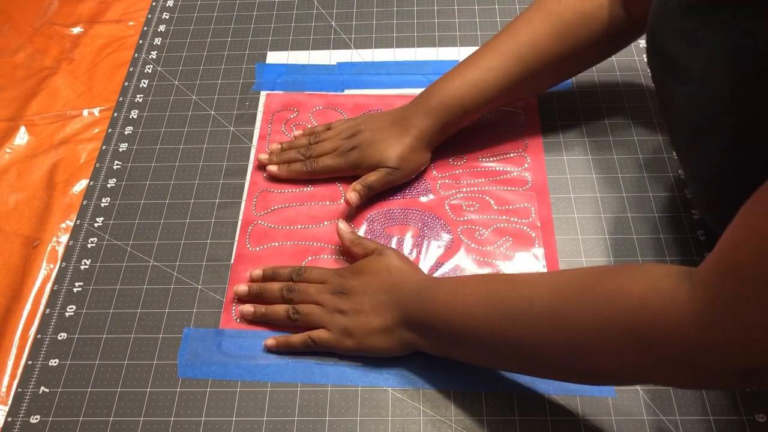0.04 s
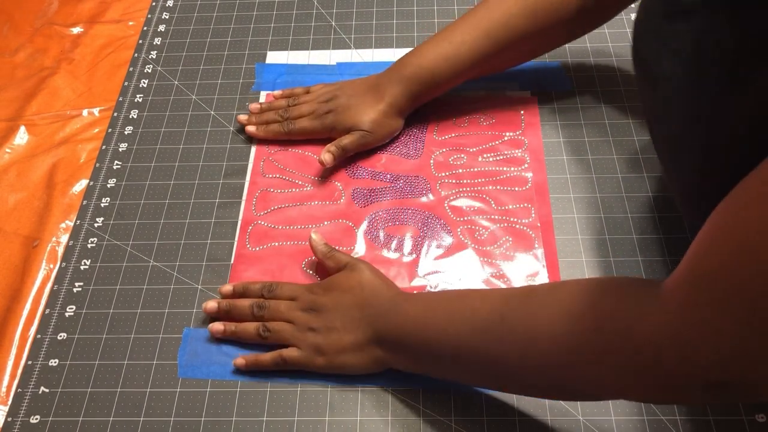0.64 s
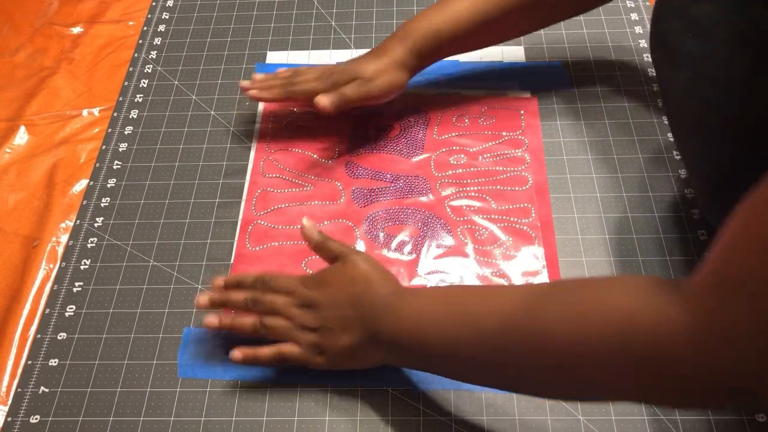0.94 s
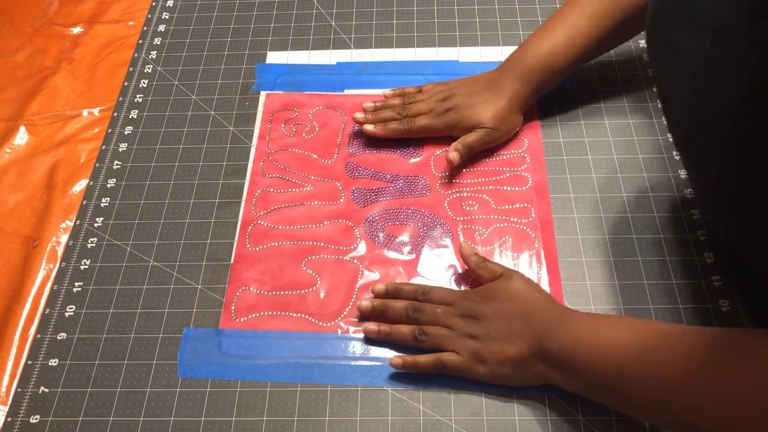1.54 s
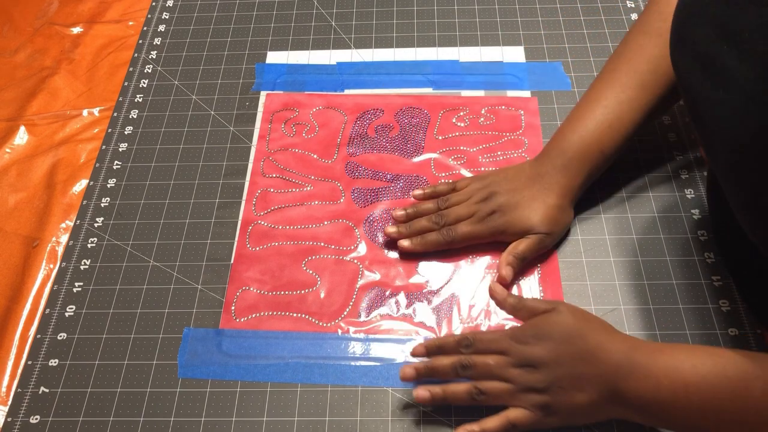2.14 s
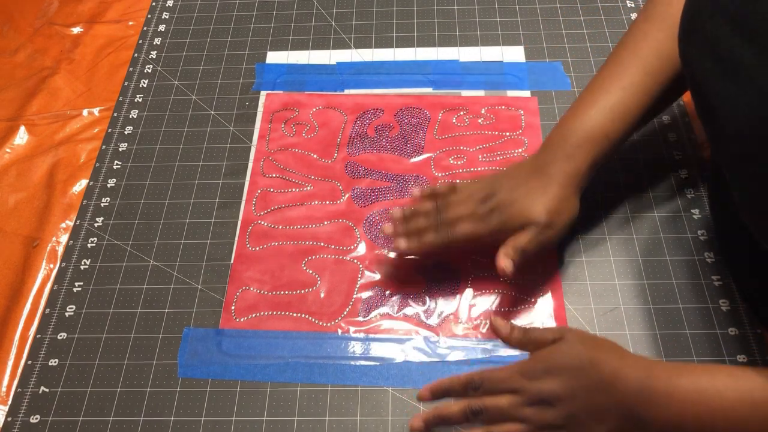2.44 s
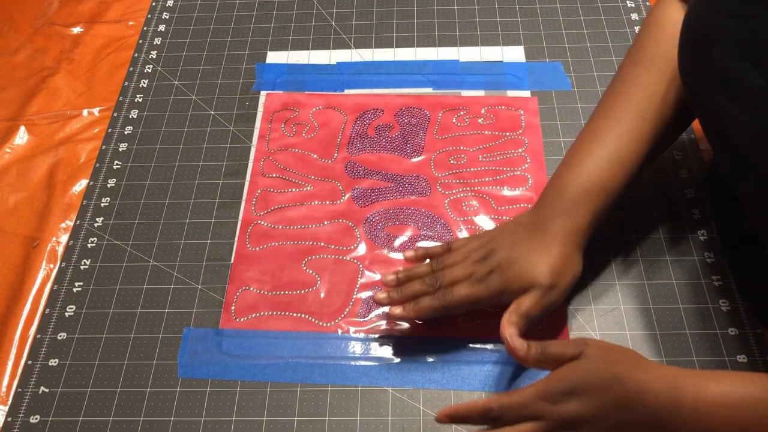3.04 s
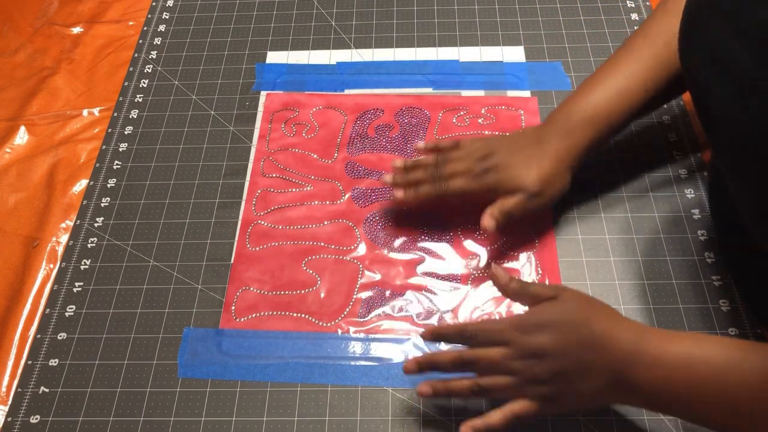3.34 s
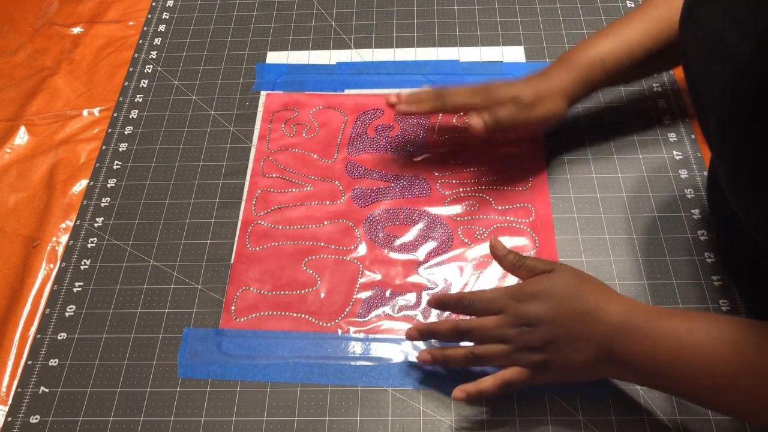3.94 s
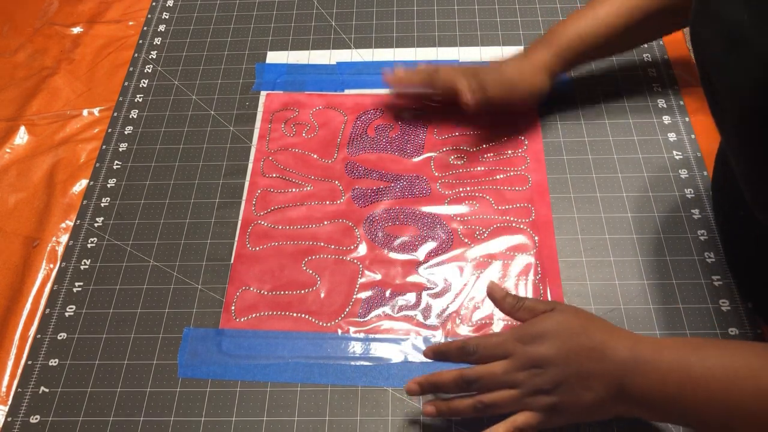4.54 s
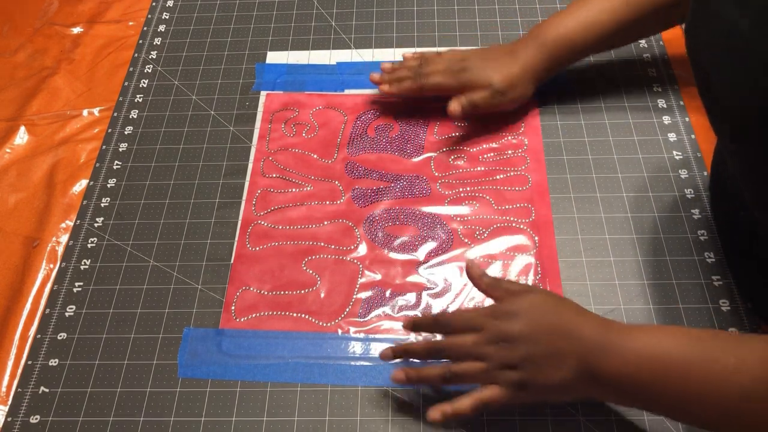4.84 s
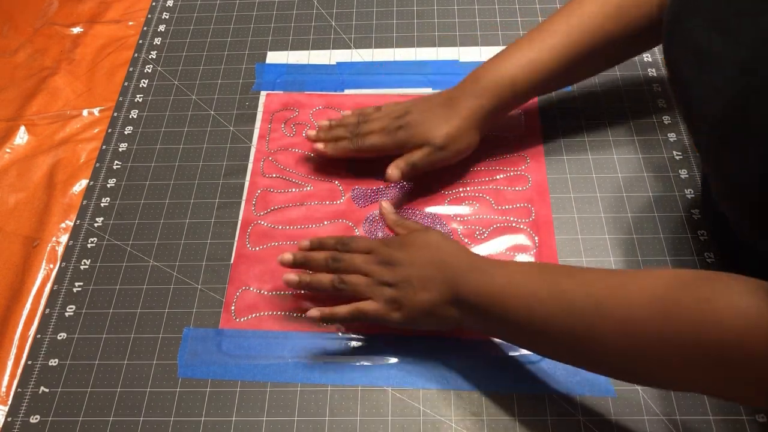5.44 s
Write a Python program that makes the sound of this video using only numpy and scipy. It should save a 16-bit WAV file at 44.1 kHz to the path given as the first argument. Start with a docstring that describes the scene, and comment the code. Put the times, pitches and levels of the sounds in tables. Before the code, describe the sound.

Hands press sticky plastic film onto a mat-covered table, heard close in a small room. It starts with a soft rub and low bump, then a cluster of crackles and sharp snaps around 0.2 seconds as a palm lifts. Light pats follow near 0.5 seconds and a short peeling rasp at 0.8. A crinkling press at 1.3 seconds leads to the firmest soft thump at about 1.45 and another peel at 1.6. More presses and peels alternate between 2 and 3 seconds, with a fingertip tap near 2.8. After a brief lull, a palm lands at 3.55 seconds, and the film pulls free with sharp snaps at 3.8 and 4.5. Faint crackles near 5 seconds precede a last crinkling press and rub at 5.5. Tiny plastic ticks and a faint appliance hum continue underneath.

```python
"""Smoothing sticky film on a craft table

Two hands pat transfer film onto a template in a small room. Patches of film pop in avalanches,
crackling as a palm lands and again as it peels away, and wrinkles buckle with a snap. Fingers ring
the table's modes through the cutting mat, skin rubs over it and leaning arms rumble.
An appliance hums softly in the background."""
import sys
import numpy as np
from scipy import signal
from scipy.fft import rfft, irfft, next_fast_len
from scipy.io import wavfile
from scipy.ndimage import uniform_filter1d

SR = 44100
rng = np.random.default_rng(int(sys.argv[2]) if len(sys.argv) > 2 else 0)


def wav_out(sig):
    """Save sig, one row per channel (or a flat mono array), as 16-bit PCM at SR to the path in sys.argv[1]."""
    wavfile.write(sys.argv[1], SR, np.round(np.clip(np.atleast_2d(sig).T, -1, 1) * 32767).astype(np.int16))


N = 246959

# The spectrum of a snap or tick in the film. Each row: frequency in Hz, relative level in dB.
SNAP_SPECTRUM = [(200, -55), (1000, -34), (1600, -7.5), (2300, -4), (4800, -0.5), (9000, -2), (13000, -4),
                 (16000, -1)]


def crinkle(level, treble_db, span_hz, body_db=0, pops_per_s=9000, clump_db=6, clump_hz=140,
            span_db=2.5, span_width_hz=1160, patches=8):
    """Crackling noise: film clings to skin and lets go in avalanches of pops, on many patches at once."""
    # The spectrum of one pop. Each row: frequency in Hz, relative level in dB.
    pop_spectrum = [(100, -11.5), (400, -2), (1000, -1.5), (1600, -0.5), (2300, -2.5), (3700, -5.5),
                    (6000, -2.5), (9000, -1.5), (13000, -4.5), (16000, -4)]
    n = len(level)
    out = np.zeros(n)
    for patch_hz in np.geomspace(2300, 13000, patches):
        pops = (rng.random(n) < pops_per_s / patches / SR) * rng.choice([-1, 1], n)
        size_db = np.minimum(rng.exponential(1, n), 3) + 6 * np.tanh(drift(85, n))
        pulse = click(pop_spectrum, 0, patch_hz, ring_db=11.5)
        out += signal.fftconvolve(pops * gain_of(size_db), pulse)[:n]
    out += gain_of(span_db) * resonate(out, span_hz, span_width_hz)  # the loose span of film rings
    out /= np.sqrt(uniform_filter1d(out ** 2, size=400) + 1e-9)  # even out the mean flow of pops
    out *= gain_of(clump_db * np.tanh(drift(clump_hz, n)))  # neighbouring patches let go together
    dull = signal.sosfiltfilt(signal.butter(2, 7000, fs=SR, output="sos"), out)
    out = dull + (out - dull) * gain_of(treble_db)  # taut film is brighter
    body = signal.sosfiltfilt(signal.butter(3, 2000, fs=SR, output="sos"), out)
    out += body * (gain_of(body_db) - 1)  # a small lifted patch has less body than film lying flat
    return level * evened(out)


def click(spectrum, treble_db, ring_hz, ring_db, size=512):
    """Impulse response of a popping patch: a minimum-phase pulse of energy 1, heavily damped."""
    hz = np.fft.rfftfreq(size, 1 / SR)
    db = read(spectrum, hz) + treble_db * hz ** 4 / (hz ** 4 + 4100.0 ** 4)
    db += ring_db / (1 + (4 * (hz / ring_hz - 1)) ** 2)
    log_gain = np.log(gain_of(np.r_[db, db[-2:0:-1]]))
    response = np.exp(np.conj(signal.hilbert(log_gain)))
    pulse = irfft(response[:len(hz)])
    return pulse / np.linalg.norm(pulse)


def presses(land_s=0.0065, spread_db_per_s=58, rest_db_per_s=657):
    """Crushing under load: a landing palm sets off a burst, and sparser pops as its weight settles."""
    # Each row: start in seconds, spreading time in seconds, relative burst level in dB, settling time
    # in seconds, relative settling level in dB, relative treble in dB, ring of the loose film in Hz.
    landings = [(0.0, .004, -47.5, .13, -66, -1.5, 2750), (0.478, 0.022, -46.5, 0.041, -58, -10, 2300),
                (0.538, 0.019, -51.5, 0.15, -58.5, -6, 3680), (1.317, 0.031, -35, 0.14, -60, -5.5, 3480),
                (2.044, .022, -36.5, 0.15, -53, -7.5, 4200), (2.65, 0.022, -41, 0.075, -50, -19, 3550),
                (3.554, 0.013, -33.5, 0.079, -55, -2.5, 3900), (4.892, 0.0086, -51.5, 0.012, -49, -6, 3600),
                (5.517, 0.011, -33, .1, -44.5, -3.5, 4070)]
    out, t = np.zeros(N), np.arange(SR // 3) / SR
    rise = np.minimum(t / land_s, 1)
    for start, spread_s, burst_db, settle_s, settle_db, treble_db, span_hz in landings:
        burst = gain_of(burst_db - spread_db_per_s * t - rest_db_per_s * np.maximum(t - spread_s, 0))
        settling = gain_of(settle_db - rest_db_per_s * np.maximum(t - settle_s, 0))
        add(out, start, crinkle(rise * burst, treble_db + 9.5, span_hz))
        add(out, start, crinkle(rise * settling, treble_db + 13, span_hz,
                                pops_per_s=1100, clump_db=15, clump_hz=90))
    return out


def peels(tug_db=23, jerk_s=0.0071, sag_db_per_s=27, let_go_db_per_s=700):
    """Adhesive failure: a lifting hand tugs with a thin rasp, jerks free, peels on and lets go."""
    # Each row: moment of pulling free, tugging time before it and peeling time after it in seconds;
    # relative level, boost at the jerk, relative treble and body in dB; ring of the loose film in Hz.
    lifts = [(0.152, 0.029, 0.083, -35, -2.5, -3.5, -2.5, 3530),
             (0.269, 0.066, 0.012, -39, 2, -3.5, 5, 4200), (0.826, 0.035, 0.065, -34, 4, -3.5, -2.5, 3430),
             (1.626, 0.055, 0.014, -32.5, 1.5, -6, -2.5, 3440),
             (2.278, 0.036, 0.027, -42.5, 2, -9, -10, 3650),
             (2.332, 0.082, 0.025, -37.5, 3.5, -6.5, -2.5, 3870),
             (2.942, 0.063, 0.042, -35, -0.5, -8.5, -3, 4000),
             (3.815, 0.037, 0.055, -36, 8, -2, -1.5, 3000), (4.481, 0.024, 0.021, -38.5, 10, -9, -17, 4340),
             (5.117, 0.12, 0.015, -52, 0, -6, 1, 3870)]
    out, t = np.zeros(N), np.arange(-SR // 9, SR // 4) / SR
    for free_at, tug_s, length, level_db, jerk_db, treble_db, body_db, span_hz in lifts:
        tug_left, peeled_s = np.maximum(-t / tug_s, 0), np.clip(t, 0, length)
        db = level_db - tug_db * tug_left + jerk_db * np.exp(-(t / jerk_s - 0.5) ** 2)
        db -= sag_db_per_s * peeled_s + let_go_db_per_s * np.maximum(t - length, 0)
        body = body_db - 11 * np.minimum(tug_left, 1)
        treble = treble_db + 8.5 + 12 * peeled_s  # brighter as the patch that still sticks shrinks
        rasp = crinkle(gain_of(db), treble, span_hz, body, span_db=3.5, span_width_hz=1050)
        add(out, free_at + t[0], rasp)
    return out


def snaps(build_s=0.0007, stutter_s=0.00065, size=600):
    """Snap-through buckling: as a wrinkle flips, small pops build to a sharp one and stutter away."""
    # Each row: time in seconds, relative level in dB, ring in Hz, relative treble in dB.
    wrinkles = [(0.0094, -31, 7400, 5), (0.0468, -28.5, 8650, -15), (0.1502, -7.5, 5860, -23),
                (0.1787, -21, 3570, -6), (0.2006, -14.5, 3330, -20), (0.2493, -17.5, 8700, -27),
                (0.2724, -15.5, 4250, -18), (0.447, -30.5, 1910, -17), (0.5044, -24.5, 1820, -27),
                (0.5459, -15, 3600, -9), (0.6175, -25.5, 2410, -18), (0.6284, -19, 9700, 18),
                (0.6584, -27.5, 1710, -52), (0.7723, -23.5, 8250, -19), (1.325, -11.5, 3400, -9),
                (1.4304, -19.5, 4320, -11), (1.4461, -21.5, 1760, -40), (1.4577, -27, 1770, -21),
                (1.5913, -18.5, 7860, -18), (2.1538, -23, 8600, 17), (2.1736, -23, 4020, 5),
                (2.3173, -17.5, 3880, -22), (2.335, -12.5, 7500, 1), (2.4147, -30, 8410, -5),
                (2.691, -21.5, 2680, -38), (2.7114, -22, 3260, 15), (2.7743, -18, 1580, -13.5),
                (2.858, -25.5, 4170, -13), (3.07, -28, 1690, -3), (3.64, -21.5, 7940, -20),
                (3.733, -29, 6600, -19), (3.8203, -6, 2480, -11), (3.8627, -18.5, 1690, -24),
                (3.985, -31, 11840, 0), (4.1872, -24, 7300, -10), (4.3055, -27.5, 8100, 1),
                (4.3126, -33, 6850, 3), (4.3632, -21, 2980, -15), (4.4462, -28.5, 6520, -18),
                (4.4823, -6.5, 3170, -9.5), (4.4922, -13, 5000, -6), (4.6002, -21, 11100, -7),
                (4.9014, -28, 6540, -9), (5.023, -23.5, 5100, -22), (5.0863, -29, 4560, 18),
                (5.1, -28, 4970, -22), (5.5717, -13.5, 8500, -3)]
    out, t = np.zeros(N), (np.arange(size) - size // 4) / SR
    mean_db = np.mean(np.transpose(wrinkles)[1])
    for at, db, ring_hz, treble_db in wrinkles:
        slowness = gain_of(0.58 * (db - mean_db))  # big wrinkles take longer
        envelope = np.exp(-np.maximum(t / stutter_s, -t / build_s) / slowness)
        pops = rng.choice([-1, 1], size) * (rng.random(size) < 0.5) * envelope
        pops = evened(pops) / np.sqrt(size) + gain_of(-6) * (t == 0)
        snap = signal.fftconvolve(pops, click(SNAP_SPECTRUM, treble_db + 9.5, ring_hz, ring_db=8))
        add(out, at + t[0] + 2 * build_s, gain_of(db + 3) * snap / np.linalg.norm(snap))
    return out


def knocks(width_octaves=0.54, rise_cycles=0.83, scuff_s=0.0085):
    """Modal excitation: each blow rings the table's modes that lie near its own centre frequency."""
    # Each row: start in seconds, relative peak in dB, centre in Hz (low for flesh, high for a fingertip).
    blows = [(.004, -36, 213), (0.029, -46, 200), (.091, -39, 1050), (0.556, -40, 80), (.581, -40, 1000),
             (0.614, -34.5, 188), (1.322, -38.5, 496), (1.393, -33, 806), (1.432, -45, 1300),
             (1.445, -29, 1300), (1.4507, -22, 237), (1.456, -30, 570), (1.607, -34, 204),
             (2.058, -38, 400), (2.655, -48, 484), (2.775, -26.5, 1380), (2.82, -46, 168),
             (3.562, -40.5, 510), (4.182, -44.5, 1750), (4.914, -38.5, 714), (4.973, -49.5, 1500),
             (5.527, -58, 450)]
    # The table under its mat. Each row: nominal frequency in Hz, relative level in dB, T60 in seconds.
    modes = [(79, 11, 0.14), (166, -12.5, 0.18), (235.4, -1.5, 0.061), (400, 1.5, 0.028), (563, -3, 0.052),
             (640, -6, 0.11), (813, -6, 0.057), (1396, -3.5, 0.019), (1600, 7, 0.0079), (1770, 5, 0.01)]
    out, t = np.zeros(N), np.arange(SR // 4) / SR
    for start, db, centre_hz in blows:
        ring = np.zeros(len(t))
        for hz, mode_db, t60 in modes:
            coupling = np.exp(-(np.log2(hz / centre_hz) / width_octaves) ** 2)
            ring_hz = hz * rng.uniform(0.894, 0.988)
            ring += coupling * gain_of(mode_db - 60 * t / t60) * np.sin(2 * np.pi * ring_hz * t)
        ring *= 1 - np.exp(-(t * centre_hz / rise_cycles) ** 2)  # flesh pushes gradually
        scuff = gain_of(-32.5) * np.sqrt(centre_hz / 1000)  # fingertips skid more than flesh
        push = (t == 0) + scuff * rng.standard_normal(len(t)) * np.exp(-t / scuff_s)
        knock = signal.fftconvolve(push, ring)
        add(out, start, gain_of(db - 3) * knock / abs(knock).max())
    return out


def friction(strokes, spectrum, rise_s, fade_db, gain_db, grip_db, grip_hz, stop_s=0.014):
    """Stick-slip noise: each stroke swells, fades as it slows and stumbles as the skin grips."""
    level, t = np.zeros(N), np.arange(SR // 4) / SR
    for start, length, db in strokes:
        rise = np.minimum(t / rise_s, 1)
        release = np.exp(-np.maximum(t - length, 0) / stop_s)
        add(level, start, rise * gain_of(db - fade_db * t / length) * release)
    rubbing = noise(spectrum) * gain_of(grip_db * np.tanh(drift(grip_hz)))
    return gain_of(gain_db) * level * evened(rubbing)


def rubs():
    """Sliding friction: skin brushes over the mat in strokes that start abruptly."""
    # Each row: start in seconds, length in seconds, relative level in dB.
    slides = [(0.0, 0.043, -52), (0.094, 0.049, -49.5), (0.47, 0.12, -55.5), (0.578, 0.017, -48.5),
              (0.612, 0.048, -54.5), (1.392, 0.065, -48.5), (1.448, 0.055, -47), (2.777, 0.059, -52),
              (4.912, 0.014, -51.5), (5.52, 0.23, -52.5)]
    # Each row: frequency in Hz, relative level in dB.
    skin_spectrum = [(100, 11), (250, 9.5), (700, 8.5), (1200, 0.5), (2000, -4), (5000, -14), (16000, -21)]
    return friction(slides, skin_spectrum, rise_s=0.0017, fade_db=9, gain_db=5.5, grip_db=4.5, grip_hz=89)


def shoves():
    """Friction under load: arms leaning on the table make a low rumble."""
    # Each row: start in seconds, length in seconds, relative level in dB.
    leans = [(0.0, 0.076, -49), (.545, .08, -58), (5.54, .1, -48)]
    # Each row: frequency in Hz, relative level in dB.
    rumble_spectrum = [(20, -17), (36, -1), (50, 4), (90, -20), (200, -3), (400, -44), (1500, -32)]
    return friction(leans, rumble_spectrum, rise_s=0.02, fade_db=10, gain_db=1, grip_db=4, grip_hz=30)


def creep(ticks_per_s=9, patches=6):
    """Creep under tension: the stretched film gives faint ticks at random moments."""
    out = np.zeros(N)
    for patch_hz in np.geomspace(2300, 9000, patches):
        ticks = rng.random(N) < ticks_per_s / patches / SR
        sizes = gain_of(-np.minimum(rng.exponential(1, N), 2))
        out += signal.fftconvolve(ticks * sizes, click(SNAP_SPECTRUM, 0, patch_hz, ring_db=16))[:N]
    return gain_of(-46.5) * out


def room(x, tail_db=-11, early_db=-9.5):
    """Reverberation: early reflections off table and body, then a tail that dies sooner in the treble."""
    # Each row: frequency in Hz, reverberation time T60 in seconds.
    decay_times = [(200, 0.7), (1500, 0.39), (4000, 0.32), (9000, 0.31), (15000, 0.22)]
    taps = rng.choice([-1., 1.], SR // 2) * (rng.random(SR // 2) < 0.12)
    taps[:SR // 150] = 0
    hz, t, bands = signal.stft(taps, SR, nperseg=256)
    decay = gain_of(-60 * t / read(decay_times, hz)[:, None])
    tail = signal.istft(bands * decay, SR, nperseg=256)[1]
    echo = gain_of(tail_db) * tail / np.linalg.norm(tail)
    early_delays = rng.integers(SR // 900, SR // 70, size=8)
    echo[early_delays] += gain_of(early_db) * rng.choice([-1, 1], size=8) / np.sqrt(8)
    return signal.fftconvolve(x, echo)[:N]


def snap_echoes(directions=4):
    """Directivity: a wrinkle throws a different pop each way, and each returns by its own path."""
    return sum(room(snaps()) for _ in range(directions)) / np.sqrt(directions)


def background(waver=0.064):
    """Tones over broadband noise: an appliance's wavering hum and its fan, with the room's faint hiss."""
    # The hum's partials and two noise spectra. Each row: frequency in Hz, relative level in dB.
    partials = [(59.2, -63.5), (118.4, -69), (177.6, -64), (247.6, -66.5), (473.7, -75), (554.5, -64.5),
                (635.2, -72), (710.6, -64.5)]
    fan_spectrum = [(20, -39), (40, -18), (54, 4.5), (75, -7.5), (100, -0.5), (180, -1), (240, -1),
                    (320, -4), (500, -6.5), (740, -10.5), (880, -29), (1200, -22), (3000, -54)]
    air_spectrum = [(470, -74), (800, -3), (2800, -13.5), (2980, -13.5), (3590, -13), (5270, -16.5),
                    (15500, -22.5)]
    hum, t = np.zeros(N), np.arange(N) / SR
    for hz, db in partials:
        amplitude = np.sqrt(2) * gain_of(db) * (1 + waver * drift(5.9))
        hum += amplitude * np.sin(2 * np.pi * (hz * t + rng.random()) + waver * drift(2.1))
    return gain_of(-0.5) * hum + gain_of(-56) * noise(fan_spectrum) + gain_of(-65.5) * noise(air_spectrum)


def gain_of(db):
    """Decibels to amplitude."""
    return 10 ** (np.asarray(db) / 20)


def evened(x):
    """Normalisation to rms 1."""
    return x / np.sqrt(np.mean(x ** 2) + 1e-20)


def read(points, hz):
    """Interpolation of a table on a log-frequency axis."""
    point_hz, value = np.transpose(points)
    return np.interp(np.log(hz + 1), np.log(point_hz + 1), value)


def add(mix, start, sound):
    """Superposition: a sound joins the mix at start seconds."""
    part = mix[max(round(start * SR), 0):][:len(sound)]
    part += sound[:len(part)]


def noise(spectrum):
    """Spectral shaping: steady noise of rms 1 with the given spectrum."""
    shape = gain_of(read(spectrum, np.fft.rfftfreq(N, 1 / SR)))
    return evened(irfft(rfft(rng.standard_normal(N)) * shape, N))


def drift(rate_hz, size=N):
    """Low-passed noise: a random wander of rms 1, no faster than about rate_hz."""
    length = next_fast_len(size, True)
    lowpass = np.exp(-(np.fft.rfftfreq(length, 1 / SR) / rate_hz) ** 2)
    return evened(irfft(rfft(rng.standard_normal(length)) * lowpass, length)[:size])


def resonate(x, hz, width_hz):
    """A damped resonance with a gain of about 1 at hz."""
    pole_radius = np.exp(-np.pi * width_hz / SR)
    pole = pole_radius * np.exp(2j * np.pi * hz / SR)
    return 2 * signal.lfilter([1 - pole_radius], [1, -pole], x).real


def scene():
    """Direct and reflected sound of film, hands and table add to the steady background."""
    sliding = rubs() + shoves()
    hands = gain_of(0.84) * presses() + gain_of(-0.7) * peels() + creep() + knocks() + sliding
    return (hands + room(hands) + snaps() + snap_echoes() + background())[None]


def record(dry, bass_hz=41, edge_hz=16020):
    """Band limiting: a small microphone loses the deep bass, and a steep low-pass cuts the top treble."""
    thin = signal.sosfilt(signal.butter(4, bass_hz, "highpass", fs=SR, output="sos"), dry)
    lowpass = signal.firwin(511, edge_hz, window=("kaiser", 9), fs=SR)
    return signal.oaconvolve(thin, lowpass[None], "same")


dry = scene()
out = record(dry)
wav_out(out)
```